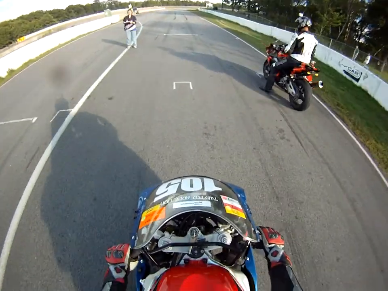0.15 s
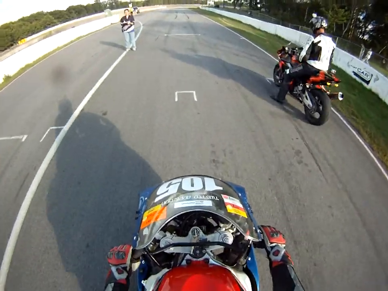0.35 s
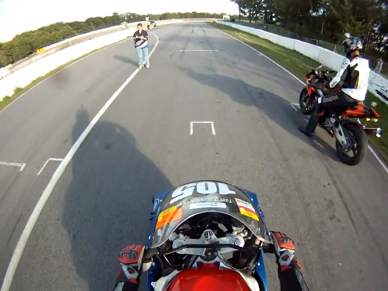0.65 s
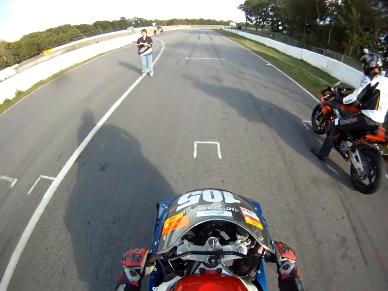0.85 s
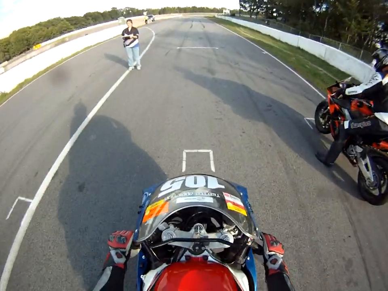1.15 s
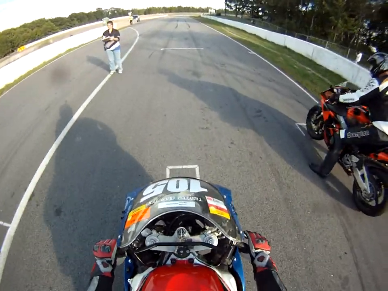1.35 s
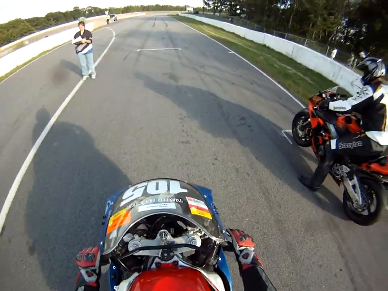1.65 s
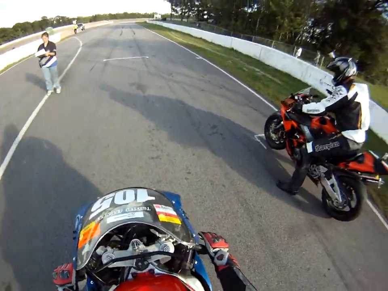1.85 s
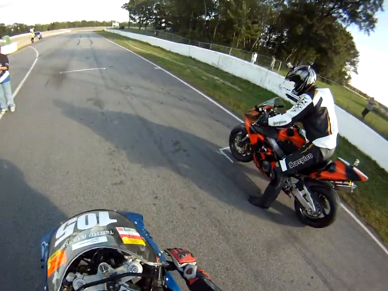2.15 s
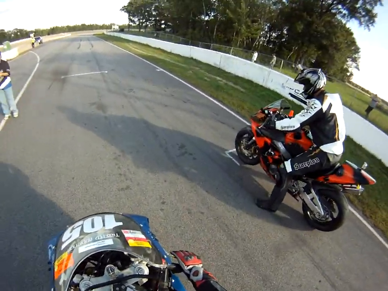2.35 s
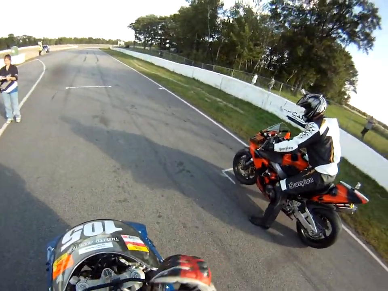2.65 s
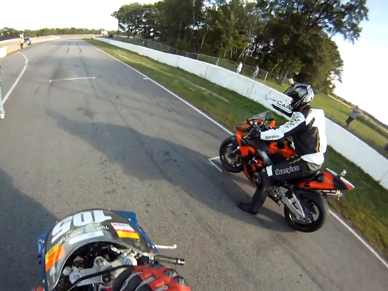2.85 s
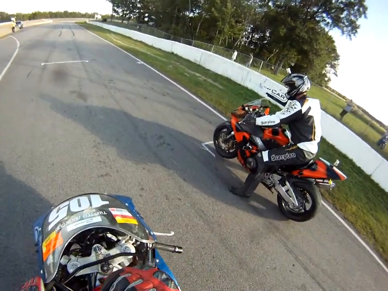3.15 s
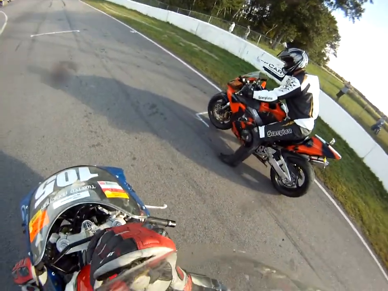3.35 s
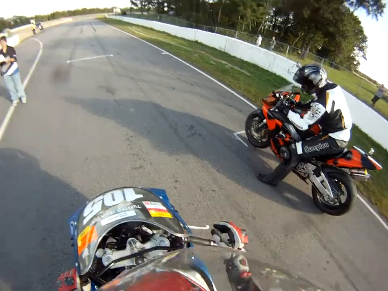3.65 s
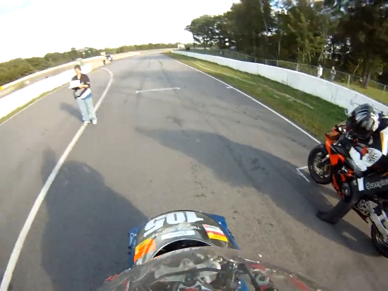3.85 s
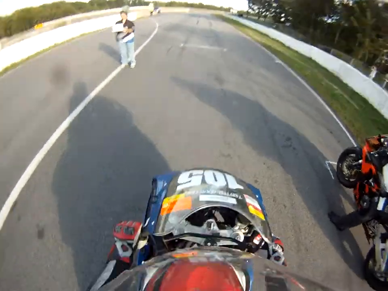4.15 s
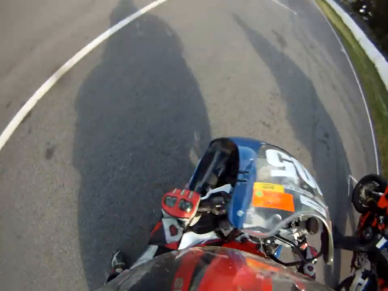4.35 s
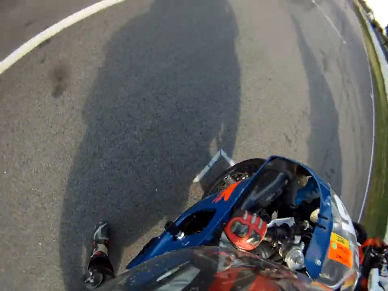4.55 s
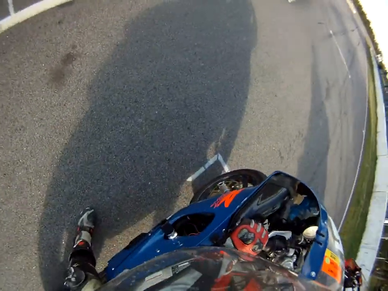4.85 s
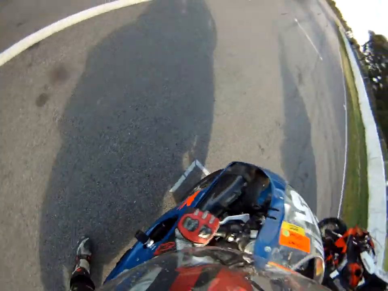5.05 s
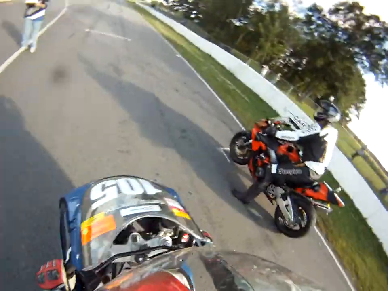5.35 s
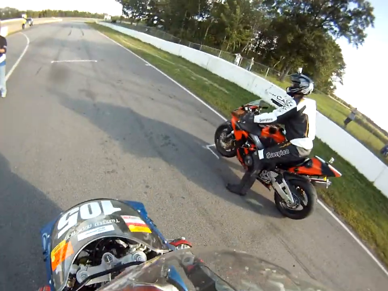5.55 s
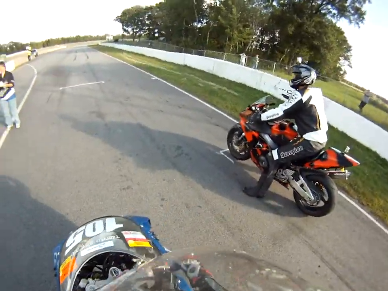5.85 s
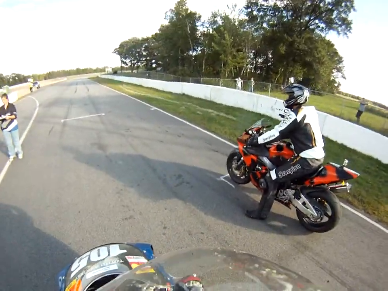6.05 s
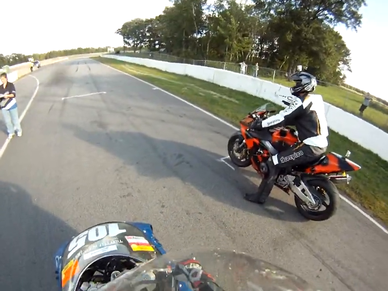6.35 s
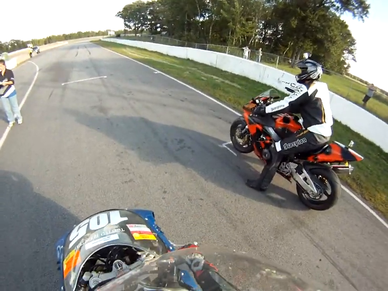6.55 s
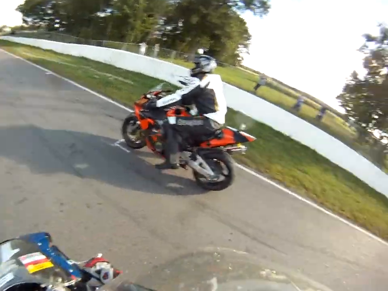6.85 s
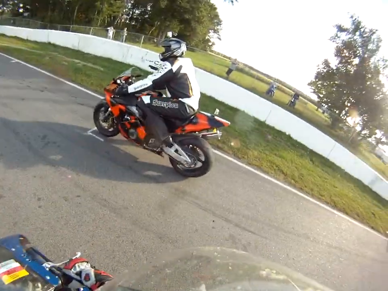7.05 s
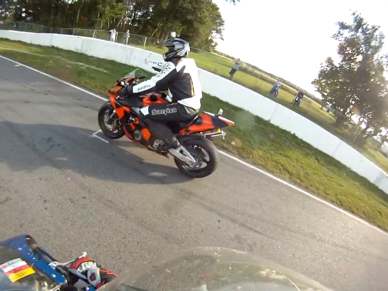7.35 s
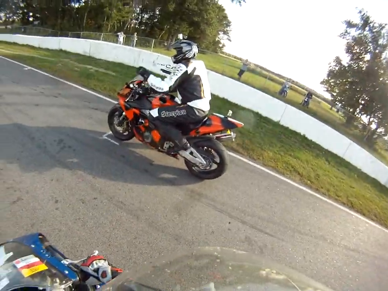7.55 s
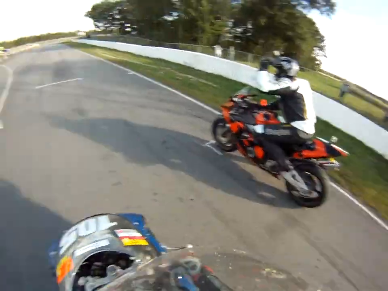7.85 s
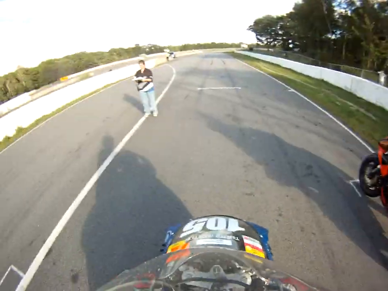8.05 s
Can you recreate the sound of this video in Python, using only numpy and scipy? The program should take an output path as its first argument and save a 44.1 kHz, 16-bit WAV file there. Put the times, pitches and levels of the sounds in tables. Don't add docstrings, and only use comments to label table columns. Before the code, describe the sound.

A boxy, gritty, nearly mono microphone in a sealed plastic case picks up a four-cylinder motorcycle slowing to idle, with other engines rumbling alongside. Handling noise breaks in: one early tap, a cluster of loud knocks and rubbing, a solid bang, two snappy clicks, then a sleeve brush with fizz and duller bumps. The engine dips briefly after the loudest hits and returns.

```python
import sys
import numpy as np
from scipy import signal
from scipy.fft import rfft, irfft, next_fast_len
from scipy.io import wavfile
from scipy.ndimage import uniform_filter1d, map_coordinates

SR = 44100
rng = np.random.default_rng(int(sys.argv[2]) if len(sys.argv) > 2 else 0)


def field_ratio(decibels):
    return 10 ** (np.asarray(decibels, dtype=float) / 20)


def transcribe(signal):
    frames = np.atleast_2d(signal).T
    limited = np.clip(frames, -1, 1)
    pcm = np.round(limited * 32767).astype(np.int16)
    wavfile.write(sys.argv[1], SR, pcm)


N = 362495


def unit(x):
    return x / np.sqrt(np.mean(x ** 2) + 1e-20)


def curves(rows):
    s, *cols = np.transpose(rows)
    return [np.interp(np.arange(N) / SR, s, c) for c in cols]


def wobble(rate):
    coarse = np.arange(0, N + 16, 16)
    knots = rng.standard_normal(int(N * rate / SR) + 4)
    smooth = map_coordinates(knots, [coarse * rate / SR])
    return np.interp(np.arange(N), coarse, smooth)


def swells(rows):
    t = np.arange(0, N / SR + .01, .005)
    bells = sum(rise * np.exp(-((t - s) / width) ** 2) for s, rise, width in rows)
    return np.interp(np.arange(N) / SR, t, bells)


def filtered(x, response):
    m = next_fast_len(N + SR // 2)
    return irfft(rfft(x, m) * response(np.fft.rfftfreq(m, 1 / SR)), m)[..., :N]


def rush(spectrum, lo_hz, hi_hz):
    f, db = np.transpose(spectrum)

    def colour(hz):
        edges = 1 / (1 + (lo_hz / (hz + 1)) ** 8) / (1 + (hz / hi_hz) ** 8)
        return field_ratio(np.interp(np.log(hz + 1), np.log(f + 1), db)) * edges

    return unit(filtered(rng.standard_normal(N), colour))


def modes(rows):
    def response(f):
        return sum((-1) ** k * field_ratio(db) * 1j * f * width / (hz * hz - f * f + 1j * f * width)
                   for k, (hz, width, db) in enumerate(rows))
    return response


def exhaust(turns, orders, unsteady_db):
    total = np.zeros(N)
    for multiple, db in orders:
        level = field_ratio(db + unsteady_db * wobble(7))
        total += level * np.sin(2 * np.pi * (multiple * turns + rng.random()))
    return total


# firing rate in Hz, level in dB, then its notes, each as multiple of the firing rate, level in dB.
NEIGHBOURS = [
    (43.7, -52, [(1, -2), (2, -2), (3, -1), (4, -5), (5, -8), (6, -3), (7, -10)]),
    (39.5, -53, [(1, -4), (2, -1), (3, -1), (4, -3), (5, -10), (6, -12), (7, -11)]),
]


def neighbours():
    total = np.zeros(N)
    for hz, db, orders in NEIGHBOURS:
        turns = np.cumsum(hz * (1 + 0.0096 * wobble(4.7))) / SR
        total += field_ratio(db) * exhaust(turns, orders, unsteady_db=4.5)
    return total


# time in seconds, bow from 0 (upright) to 1 (full).
BOW = [
    (0, 0.01),
    (4.2, 0.03),
    (4.45, .25),
    (4.63, 0.91),
    (4.97, 1),
    (5.29, 0.3),
    (5.44, .25),
    (5.54, 0.09),
    (8.22, 0.01),
]


def head_bow():
    return curves(BOW)[0]


# middle in seconds, half-length in seconds, pressure from 0 to 1.
BRUSH = [
    (6.205, 0.091, 0.64),
    (6.38, 0.093, 1),
    (6.53, 0.07, 0.25),
]


def sleeve_brush():
    t = np.arange(N) / SR
    return sum(press * np.exp(-np.abs((t - s) / half) ** 3) for s, half, press in BRUSH)


# frequency in Hz, level in dB per Hz.
RUMBLE = [(4.7, -26), (8.0, -15), (43, 0.5), (108, -7), (214, -8), (281, -9), (382, -18), (483, -36.5),
          (600, -35), (780, -42), (1320, -120)]
# middle in seconds, rise in dB, half-width in seconds.
SHIFTS = [
    (.6, 1.5, .2),
    (3.7, 1.5, .1),
    (5.5, 0.5, .2),
    (6.27, 12, 0.079),
    (6.58, 4.5, 0.2),
    (6.9, 4, 0.14),
    (8.22, 4.5, 0.19),
]


def rumble(bow):
    level_db = -44.5 - 2 * bow + swells(SHIFTS) + 1.5 * wobble(25)
    return field_ratio(level_db) * rush(RUMBLE, lo_hz=4.2, hi_hz=500)


def fizz(brush):
    level_db = -68.5 + 19 * brush + 2 * wobble(40)
    band = [(4700, -25), (5120, -6), (5300, 0), (5480, -6), (5900, -25)]
    return field_ratio(level_db) * rush(band, lo_hz=4300, hi_hz=6200)


# middle in seconds, rise in dB, half-width in seconds, pitch shift in Hz.
WHINE_SWELLS = [(.22, 8.5, 0.33, 20), (.93, 7.5, 0.13, 80), (1.29, 10.5, 0.084, -69),
                (1.49, 15.5, 0.17, -10), (1.75, 5, 0.09, -91), (3.75, 6, 0.19, -40),
                (4.48, 5.5, 0.052, -10.5), (4.76, 4, 0.066, -11), (4.94, 9, 0.22, 10),
                (5.3, 8.5, 0.15, 10.5), (6.95, 2, .15, 10), (7.8, 2.5, .2, 10.5)]


def gear_whine(turns, bow, brush):
    rises = [(s, rise, width) for s, rise, width, _ in WHINE_SWELLS]
    shifts = [(s, shift, width) for s, _, width, shift in WHINE_SWELLS]
    level_db = -62 + 5 * bow + 11 * brush + swells(rises)
    sag_hz = 175.6 * np.clip(4 * bow, 0, 1)
    hz = 3664 - sag_hz + 24.8 * wobble(4) + swells(shifts)
    blip_db = np.clip(-.5 * (level_db + 51), 0, 4.5)
    level = field_ratio(level_db - 2.0 + 1.2 * wobble(12) + blip_db * np.cos(np.pi * turns))
    slow = [(0, 0), (80, 0), (300, -20), (2000, -60)]
    fuzz = [rush(slow, lo_hz=.1, hi_hz=900) for _ in range(2)]
    centre = 2 * np.pi * np.cumsum(hz) / SR
    return level * (fuzz[0] * np.cos(centre) + fuzz[1] * np.sin(centre))


# frequency in Hz, level in dB per Hz.
BODY = [(210, -24), (350, -6), (482, -13.5), (612, -13.5), (723, -15), (1020, -12.5), (1230, -13),
        (1330, -18.5), (1870, -11.5), (2080, 3), (2450, -2), (2870, -14), (3690, -14), (4050, -18.5),
        (5390, -19.5), (6000, -21.5), (7800, -63), (13200, -120)]


def valve_clatter(hz, turns, bow, brush):
    rattle = field_ratio(0.46 * np.cos(2 * np.pi * turns) + 0.426 * wobble(30) + 1.03 * wobble(120))
    upper_db = -48 + 0.1 * (hz - 50) + 4.5 * bow + 5.5 * brush
    upper = field_ratio(upper_db) * unit(rattle * rush(BODY, lo_hz=1700, hi_hz=5680))
    lower = field_ratio(-54.5) * unit(rattle * rush(BODY, lo_hz=371, hi_hz=1700))
    ring = rush([(1500, -14), (1720, -5), (1950, -13.0)], lo_hz=1400, hi_hz=2100)
    return upper + lower + field_ratio(7.5 * bow - 63) * ring


# time in seconds, firing rate in Hz, exhaust level in dB.
OWN = [
    (0, 60.5, -43.5),
    (.4, 55.1, -46),
    (.8, 49.6, -49),
    (1.5, 48.53, -51.5),
    (3, 48.54, -45.5),
    (4.5, 49.96, -42),
    (5.2, 49.9, -42),
    (6, 48.6, -45.5),
    (7.3, 47.9, -44),
    (8.3, 48.53, -43.5),
]
# multiple of the firing rate, level in dB.
OWN_ORDERS = [(.5, -18), (1, 0), (1.5, -14), (2, -1), (3, -16), (4, -17), (5, -18), (6, -16)]


def engines():
    hz, own_db = curves(OWN)
    turns = np.cumsum(hz * (1 + 0.00838 * wobble(6))) / SR
    bow, brush = head_bow(), sleeve_brush()
    own = field_ratio(own_db + 2.0) * exhaust(turns, OWN_ORDERS, unsteady_db=3.5)
    low = neighbours() + rumble(bow) + own
    high = fizz(brush) + gear_whine(turns, bow, brush) + valve_clatter(hz, turns, bow, brush)
    return low + high


def gliding_tones(rows):
    out = np.zeros(N + SR)
    for s, db, start_hz, end_hz, length in rows:
        u = np.arange(round(length * SR)) / (length * SR)
        phase = 2 * np.pi * np.cumsum(start_hz + (end_hz - start_hz) * u ** 0.99) / SR
        rough = 1 + 0.3 * uniform_filter1d(rng.standard_normal(SR // 5), size=14)[:len(u)]
        swell = np.sin(np.pi * u ** 0.78) ** 2
        out[round(s * SR):][:len(u)] += field_ratio(db) * swell * rough * np.sin(phase)
    return out[:N]


# start in seconds, peak in dB, start pitch in Hz, end pitch in Hz, length in seconds.
WHISTLES = [
    (1.1, -64, 4380, 4470, .15),
    (1.95, -62, 4700, 4640, .1),
]


def whistles():
    return gliding_tones(WHISTLES)


# start in seconds, first push (+1 in, -1 out), peak in dB, swing rate in Hz.
JOLTS = [(2.062, 1, -25, 81), (2.983, 1, -16, 190), (3.036, 1, -25, 93), (3.104, -1, -21, 67.4),
         (3.296, -1, -13, 62), (3.309, 1, -12, 121), (3.504, 1, -24, 77.5), (4.134, -1, -17, 165),
         (4.26, -1, -18.5, 52.4), (4.279, -1, -5, 110), (4.288, 1, -7, 66), (5.504, -1, -38.5, 87),
         (6.284, -1, -21, 93), (6.406, 1, -28, 95), (7.927, 1, -24, 62.3)]
SWAYS = [(3.005, -1, -18, 30), (3.173, 1, -26.5, 70.4), (3.376, 1, -20.5, 68.3), (3.438, 1, -24, 88.6),
         (4.4, 1, -22.5, 94.2), (4.456, -1, -30, 91), (4.628, -1, -29, 70.9), (6.745, 1, -20, 55.7),
         (7.876, -1, -18, 59.2), (8.15, 1, -27, 62)]
WOBBLES = [(2.8732, -1, -4.5, 86), (2.935, 1, -20, 74), (3.53, -1, -22.5, 60), (4.16, 1, -23, 60.7),
           (4.303, 1, -20.5, 73.6), (6.329, -1, -17, 56.6), (6.568, 1, -16.5, 56.7), (7.0, -1, -13, 78),
           (7.036, 1, -19.5, 80)]
LURCHES = [(2.9955, -1, -4.5, 95), (3.0785, -1, -7, 88), (3.266, 1, -9, 62), (6.481, -1, -10.5, 82),
           (6.966, -1, -13, 66)]
SLAMS = [(2.9748, 1, -2.5, 200), (4.1268, 1, 2.5, 192)]
# rise in cycles, seconds for a full-scale swing to fall 60 dB, growth of that time
# (dB per dB softer), abruptness of the stop.
SWING = [
    (0.16, 0.031, 0.48, 1),
    (0.69, 0.011, 1.11, 1),
    (0.12, 0.049, 0.83, 1),
    (3, 0.018, 0.7, 2),
    (0.08, 0.0145, 0.1, 2),
]


def mount_thumps():
    out, t = np.zeros(N + SR), np.arange(SR // 3) / SR
    kinds = (JOLTS, SWAYS, WOBBLES, LURCHES, SLAMS)
    for pushes, (rise_cycles, hard_t60, growth, abrupt) in zip(kinds, SWING):
        for s, way, db, hz in pushes:
            t60 = hard_t60 * field_ratio(-growth * db)
            fade = field_ratio(-60 * (t / t60) ** abrupt)
            swing = np.sin(2 * np.pi * hz * t) * (1 - np.exp(-t * hz / rise_cycles)) * fade
            out[round(s * SR):][:len(t)] += np.sign(way) * field_ratio(db) * swing / np.abs(swing).max()
    swings = out[:N]
    creak = rush([(100, 11.0), (250, -4), (500, -21.5), (1200, -24.5)], lo_hz=120, hi_hz=1500)
    return swings + field_ratio(-17) * np.abs(swings) ** 1.4 * creak


# start in seconds, peak in dB, start pitch in Hz, end pitch in Hz, length in seconds.
SQUEAKS = [(2.912, -16, 3790, 3420, 0.0086), (2.916, -29, 3420, 2700, 0.0091),
           (2.91, -21.5, 1820, 1700, 0.012), (2.915, -33, 1500, 1296, .014),
           (2.952, -19.5, 2000, 940, 0.0093), (2.952, -30, 3650, 3450, 0.0059),
           (2.8, -40, 2050, 2100, 0.012), (3.047, -32, 2000, 2050, .011), (6.477, -30, 1305, 769, 0.012)]


def squeaks():
    return gliding_tones(SQUEAKS)


def choked_rings(rows):
    out, t = np.zeros(N + SR), np.arange(SR // 10) / SR
    for s, db, hz, t60 in rows:
        fade = field_ratio(-60 * (t / (.62 * t60)) ** 1.6)
        ring = -np.sin(2 * np.pi * hz * t) * (1 - np.exp(-t / .0006)) * fade
        out[round(s * SR):][:len(t)] += field_ratio(db - 2.5) * ring / np.abs(ring).max()
    return out[:N]


# start in seconds, peak in dB, pitch in Hz, seconds to fall 60 dB.
PANELS = [(2.055, -23, 991, .04), (2.055, -26, 1450, .015), (2.055, -28, 528, .03),
          (2.056, -25, 2100, .025), (2.876, -18, 1080, .025), (2.89, -33, 1100, .025),
          (2.891, -34, 2100, .02), (2.975, -11, 950, .016), (2.977, -20, 2400, .012),
          (2.9755, -22, 3700, .012), (2.988, -17, 950, .02), (3.005, -24, 2100, .02),
          (3.034, -29, 950, .025), (3.034, -20, 220, .035), (3.058, -37, 2050, .03), (3.08, -18, 830, .025),
          (3.08, -22, 2120, .02), (3.117, -43, 2200, .02), (3.273, -26, 1150, .015), (3.3, -1, 1400, .02),
          (3.3, -4, 1620, .016), (3.303, -6, 740, .022), (3.304, -7, 3580, .022), (3.303, -14, 4150, .02),
          (3.312, -23, 850, .06), (3.331, -27, 960, .025), (3.322, -32, 2200, .015), (3.418, -36, 580, .04),
          (4.127, -8, 960, .025), (4.127, -13, 1480, .02), (4.127, -22, 540, .03), (4.128, -16, 2300, .015),
          (4.128, -21, 2900, .012), (4.128, -22, 3650, .015), (4.159, -16, 1000, .03),
          (4.281, -22, 1300, .025), (4.296, -24, 2100, .015), (6.288, -21, 900, .025),
          (6.301, -26, 750, .025), (6.477, -33, 1080, .03), (6.566, -40, 650, .03), (6.979, -36, 900, .03),
          (7.003, -30, 780, .03), (7.031, -37, 850, .025)]


def panels():
    return choked_rings(PANELS)


# share of the contact spent pressing in, high modes under middle modes in dB,
# first strike relative to the rattle.
TOUCH = [
    (.03, 13, 0.51),
    (.3, 7.5, 0.035),
    (.9, 3.5, 0.0215),
    (0.024, 4, 0.51),
    (0.036, 27, 0.9),
]
TAP, RUB, SLIDE, CLICK, KNOCK = TOUCH
SOFT_HZ = [1900, 3180, 5500]


def contacts(rows, touch, groups):
    rise, dull_db, strike = touch
    out, t = np.zeros(N + SR), np.arange(2 ** 12) / SR
    hz = np.fft.rfftfreq(len(t) * 2, 1 / SR)
    rings = [modes(group)(hz) / (1 + 1j * hz / soft_hz - (hz / soft_hz) ** 2)
             for group, soft_hz in zip(groups, SOFT_HZ)]
    linger = np.array([[5], [3.5], [2.8]])
    for s, db, hard_db, length in rows:
        release = field_ratio(-60 * np.maximum(t - 0.58 * length, 0) / (linger * length))
        press = (1 - np.exp(-t / (rise * length))) * release
        grains = np.repeat(field_ratio(2.66 * rng.standard_normal(len(t) // 30 + 1)), 30)[:len(t)]
        first_hit = strike * np.sqrt(length * SR) * (t == 0)
        force = press * grains * rng.standard_normal(press.shape) - first_hit
        sound = irfft(rfft(force, len(t) * 2) * rings)[:, :len(t)]
        loudest = np.sqrt(uniform_filter1d(sound ** 2, size=220).max(axis=1))
        levels = field_ratio(db + np.array([0, hard_db, hard_db - dull_db]) - 4.5)
        out[round(s * SR):][:len(t)] += (levels / loudest) @ sound
    return out[:N]


# start in seconds, low modes in dB, hardness (middle over low modes) in dB, length in seconds.
CLICKS = [
    (3.826, -47, 8, .0027),
    (5.506, -20, 0, 0.006),
    (5.691, -24, 1, 0.0031),
]
# frequency in Hz, width in Hz, level in dB.
LATCH = [
    [(650, 500, -18), (1100, 400, -3), (1550, 400, -6)],
    [(2100, 300, 0), (2490, 200, -5), (2900, 300, -6)],
    [(3500, 300, -1), (3900, 300, 0), (4430, 300, -10), (5100, 500, -9)],
]
# start in seconds, peak in dB, pitch in Hz, seconds to fall 60 dB.
SPRING = [(5.5062, -17, 1000, .06), (5.5065, -23, 3850, .02), (5.5062, -21, 1650, .022),
          (5.508, -22, 2150, .035), (5.509, -25, 2840, .025), (5.508, -22, 3500, .025),
          (5.6913, -20, 1000, .045), (5.692, -26, 2520, .025), (5.693, -16, 2070, .03),
          (5.6915, -20, 3620, .015)]


def visor_latch():
    return contacts(CLICKS, CLICK, LATCH) + choked_rings(SPRING)


# start in seconds, low modes in dB, hardness (middle over low modes) in dB, length in seconds.
TAPS = [(2.055, -21, -2, 0.0021), (2.89, -36, -6, .0026), (2.975, -15, -7, 0.0029),
        (2.988, -24, -2, 0.0065), (3.028, -31, 1, 0.0057), (3.078, -27, 2, 0.0053), (3.274, -35, -13, .004),
        (3.323, -41, -6, .003), (3.415, -38, -28, .0025), (3.842, -36.5, -14, 0.0025),
        (4.076, -29, 2, 0.0032), (4.121, -26, 3, 0.0025), (4.127, -13, 2, 0.0016), (4.158, -21, -2, .0034),
        (4.402, -33.5, -4.5, 0.0035), (4.582, -30.5, -15, 0.0041), (6.565, -46, 0, 0.0046),
        (6.968, -31, 2, .003), (7.001, -32, -5, .0047), (7.033, -40.5, 2, .0045),
        (7.808, -36.5, -12, 0.0018), (7.872, -39, 1.5, 0.0028)]
RUBS = [(2.871, -26, 0, 0.006), (2.908, -35, 7, 0.0054), (2.923, -42, -6, .0059),
        (2.952, -25.5, -8, 0.0097), (2.959, -29, -12, 0.014), (2.984, -21.5, -12, 0.0066),
        (2.996, -28, -6, 0.0039), (3.002, -29.5, 0, 0.0038), (3.034, -36.5, -12, 0.015),
        (3.089, -53, 6, 0.0042), (3.3, 2, -4, 0.0033), (3.304, -8.5, 6, 0.0027), (3.312, -51, 7, 0.011),
        (3.328, -26, -6.5, 0.016), (3.35, -31, -10, .008), (3.364, -29.5, -11, 0.0084),
        (3.385, -32, -12, 0.0064), (4.135, -40, -1.5, 0.014), (4.17, -44, -11, 0.0066),
        (4.267, -28, -1, 0.014), (4.278, -18, -1.5, 0.011), (4.291, -30.5, 9, 0.007),
        (4.314, -41, -11, .005), (6.27, -33, -4, .009), (6.98, -39, -1, 0.011), (7.012, -46, 1, 0.0085)]
SLIDES = [(3.071, -34, -15, 0.0066), (3.248, -36, -13, 0.028), (3.293, -13, -3, 0.009),
          (4.097, -41, -7, .022), (4.25, -40, -2, .012), (4.26, -34.5, -6, 0.013)]
KNOCKS = [(3.117, -45, 2, 0.0019), (6.287, -20, 4, 0.0039), (6.301, -26, -2, 0.00089),
          (6.308, -32, 8.5, .0032), (6.408, -21, -5, 0.00054), (6.477, -33, -10, 0.0023)]
# frequency in Hz, width in Hz, level in dB.
CASE = [(363, 500, -4.5), (739, 110, 2), (965, 162, 5.5), (1353, 1430, -8), (2186, 290, 10),
        (2700, 380, -1), (3637, 125, -1), (4950, 1300, -21.5)]


def glove_raps():
    groups = (CASE[:4], CASE[4:6], CASE[6:])
    kinds = ((TAPS, TAP), (RUBS, RUB), (SLIDES, SLIDE), (KNOCKS, KNOCK))
    return sum(contacts(rows, touch, groups) for rows, touch in kinds)


def gain_control(knocks, knee_db, ratio, hold, release_db):
    power = np.abs(uniform_filter1d(knocks ** 2, size=440))
    over_db = np.maximum(10 * np.log10(power + 1e-12) - knee_db, 0)
    ramp = release_db * np.arange(N) / SR
    falling = np.maximum.accumulate(over_db + ramp) - ramp
    late = np.maximum(falling, np.pad(falling, (round(hold * SR), 0))[:N])
    return -ratio * uniform_filter1d(late, size=600, origin=299)


def scene():
    knocks = whistles() + mount_thumps() + squeaks() + panels() + visor_latch() + glove_raps()
    duck_db = gain_control(knocks, knee_db=-18, ratio=1.0, hold=0.059, release_db=111.0)
    return np.tile(field_ratio(duck_db) * engines() + knocks, (2, 1))


def roll_off(x):
    return signal.sosfilt(signal.butter(12, 15600, fs=SR, output="sos"), x)


def record(dry):
    hold_hz, top_hz, edge_hz = 12000, 15300, 500
    clipped = dry[:1] / (1 + np.abs(dry[:1] / 1.02) ** 16) ** (1 / 16)
    slow = signal.resample_poly(clipped, hold_hz // 300, SR // 300, axis=1)
    steps = np.repeat(slow, 4, axis=1)
    held = signal.resample_poly(steps, SR // 300, 4 * hold_hz // 300, axis=1)[:, :N]
    held = filtered(held, lambda hz: np.clip((top_hz - hz) / edge_hz + .5, 0, 1))
    stereo = held * (1 + field_ratio(-39) * np.outer([1, -1], wobble(300)))
    return roll_off(np.clip(stereo, -1, 1))


dry = scene()
out = record(dry)
transcribe(out)
```